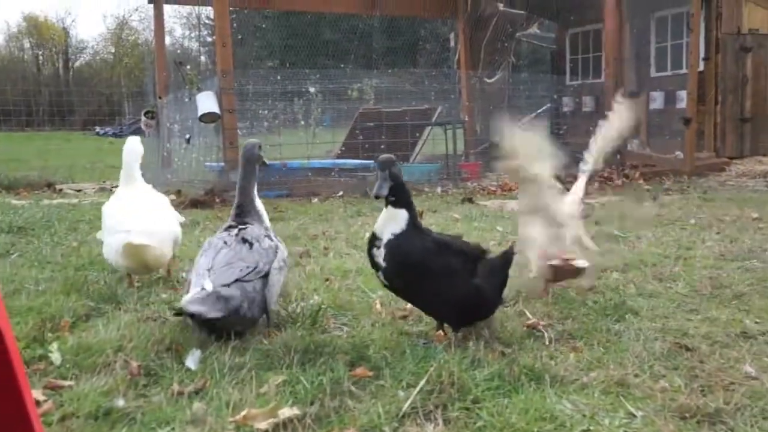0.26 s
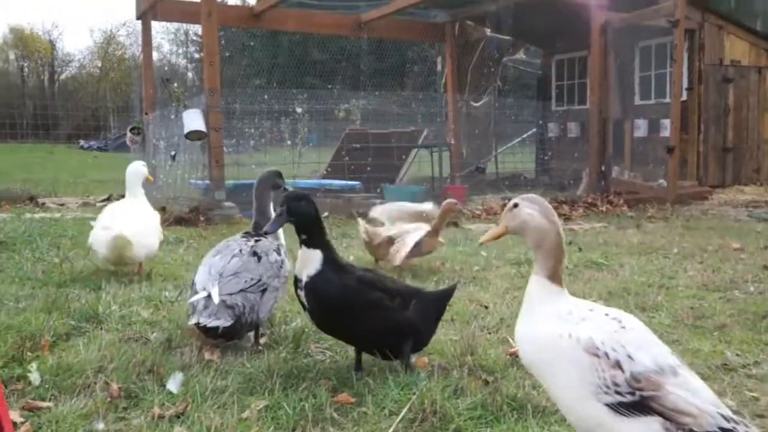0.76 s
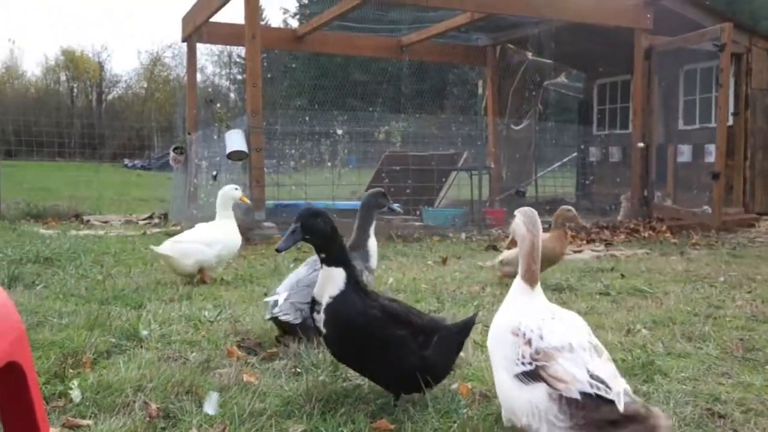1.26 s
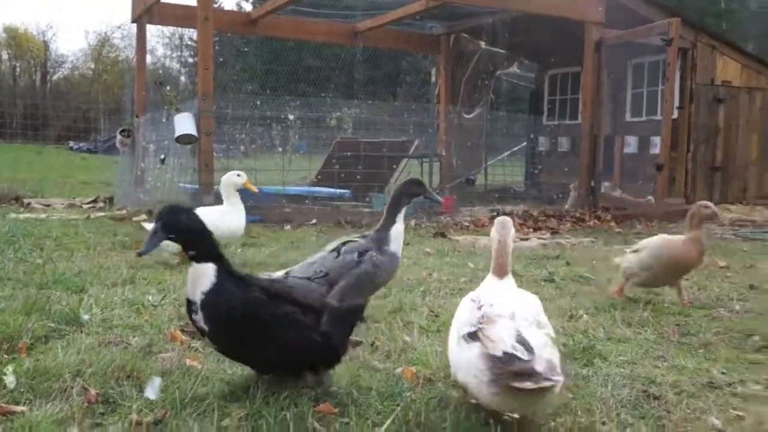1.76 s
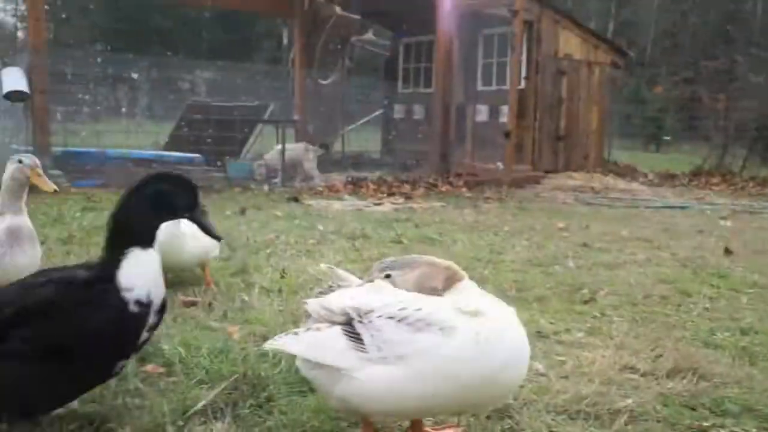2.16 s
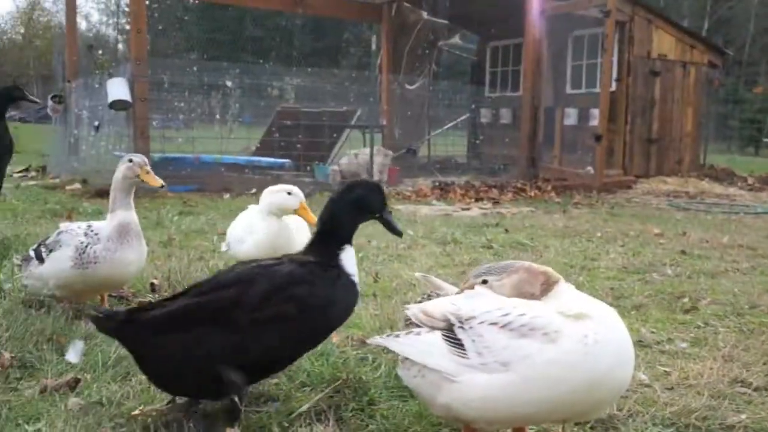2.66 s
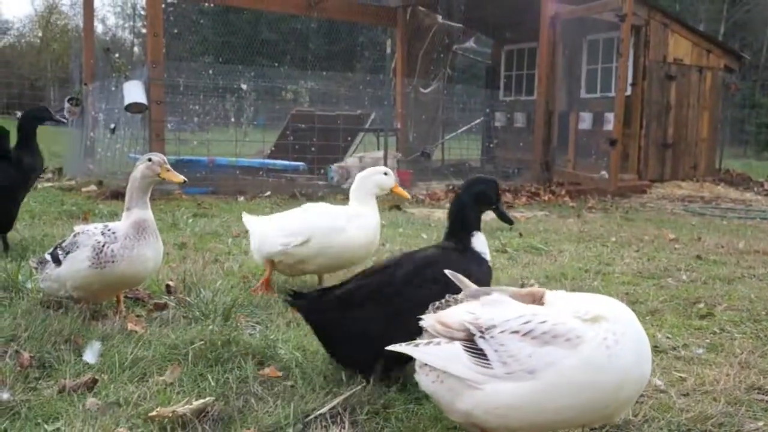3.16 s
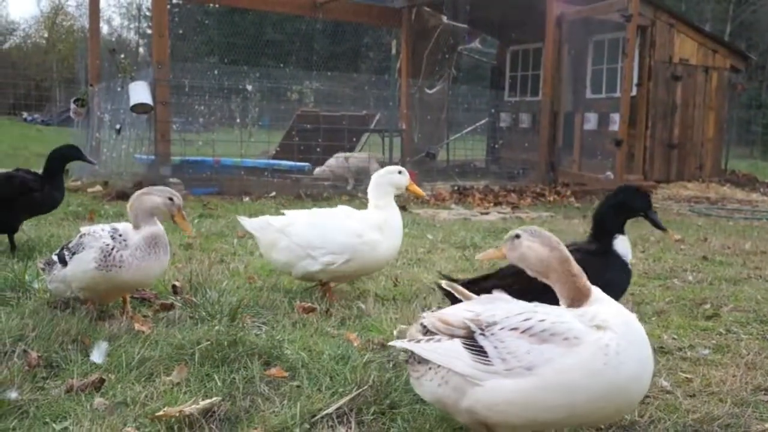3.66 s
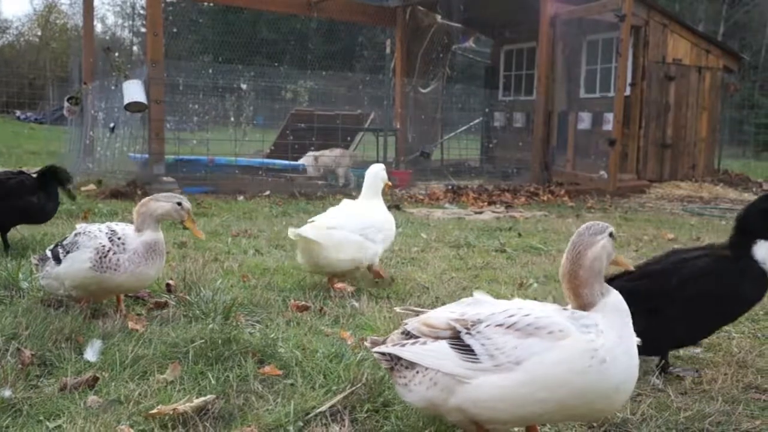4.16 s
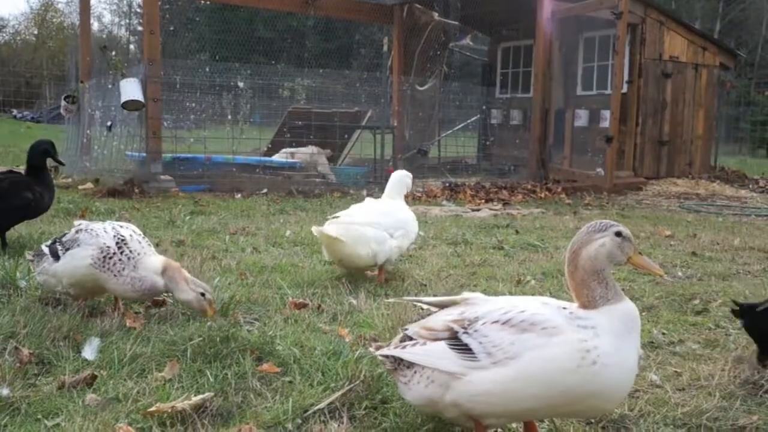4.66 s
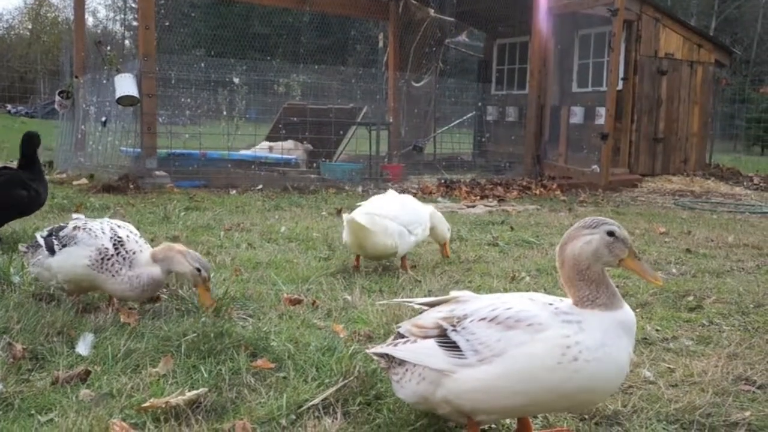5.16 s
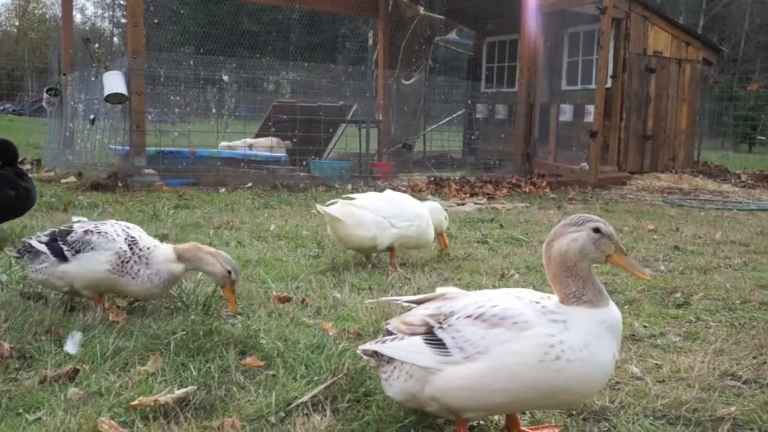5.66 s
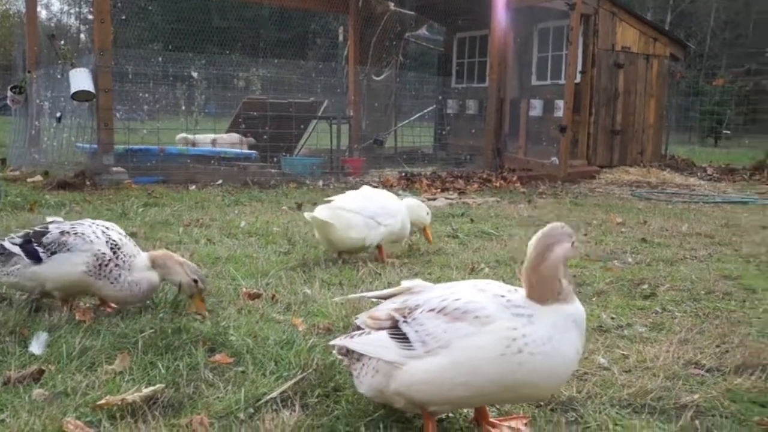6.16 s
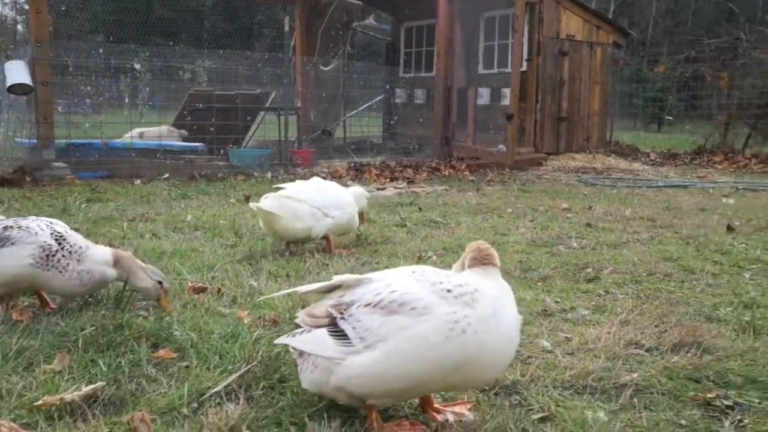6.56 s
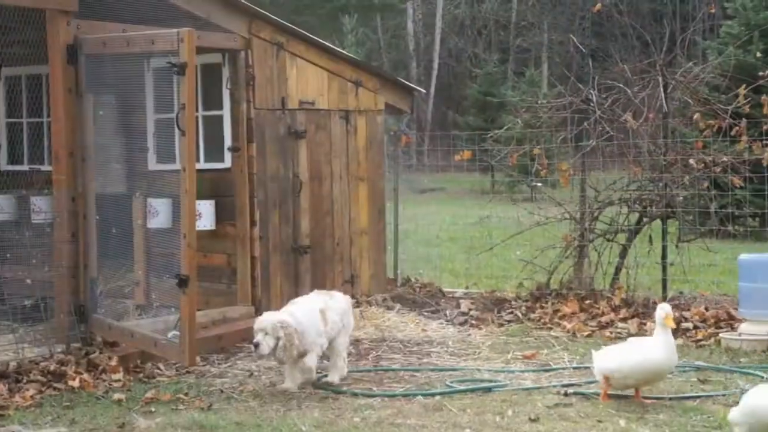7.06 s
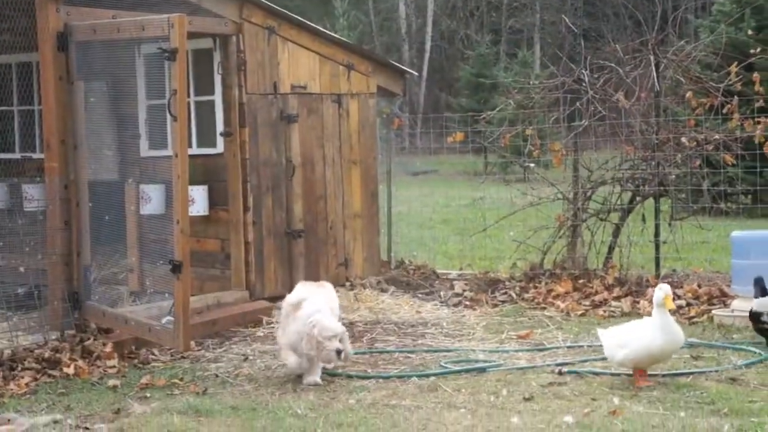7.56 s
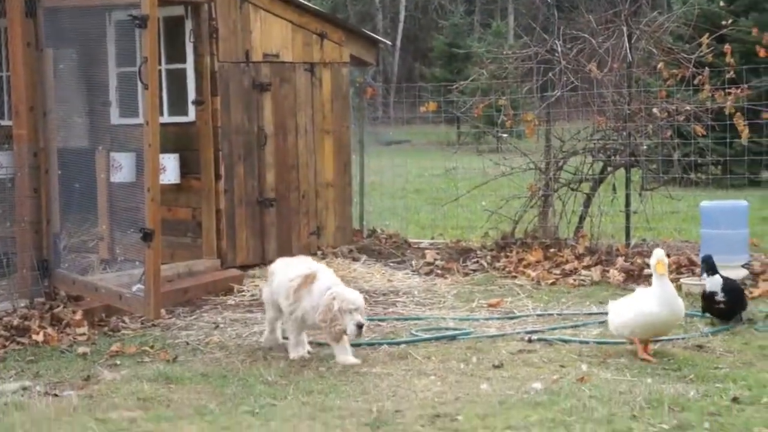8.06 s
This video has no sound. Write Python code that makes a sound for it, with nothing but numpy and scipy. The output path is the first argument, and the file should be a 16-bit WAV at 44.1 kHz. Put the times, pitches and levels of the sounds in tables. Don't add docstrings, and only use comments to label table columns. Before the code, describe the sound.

Domestic ducks quack loudly and close on a lawn, with soft clucks, brief squeaks and grass rustles, then fainter calls across the yard.

```python
import sys
import numpy as np
from scipy import signal
from scipy.fft import rfft, irfft
from scipy.io import wavfile
from scipy.ndimage import uniform_filter1d

SR = 44100
rng = np.random.default_rng(int(sys.argv[2]) if len(sys.argv) > 2 else 0)


def how_loud(loudness_db):
    steps = np.asarray(loudness_db, float) / 20
    return 10 ** steps


def bounce(signal):
    frames = np.transpose(np.atleast_2d(signal))
    limited = np.clip(frames, -1, 1)
    pcm = np.round(limited * 32767).astype(np.int16)
    wavfile.write(sys.argv[1], SR, pcm)


N = 366912

# [t/s, left-right level/dB]
FLOCK_SIDE = [(0.0, -9.5), (0.32, -2.5), (7.0, -8), (7.53, -4.5), (8.32, -4)]


def ducks():
    # [t/s, length/s, level/dB, pulse rate f/Hz, throat f/Hz]
    fading = [
        (0.0, 0.027, -11.5, 198.5, 1360),
        (.154, 0.1, -13, 234.9, 1350),
        (.419, 0.068, -13, 253.7, 1337),
        (1.006, 0.068, -16, 236.9, 1280),
        (1.226, 0.06, -14, 241.3, 1280),
        (2.386, .048, -12.5, 239.7, 1280),
        (4.44, 0.098, -32.5, 263, 1210),
        (5.223, 0.041, -17, 243, 1280),
    ]
    # [t/s, length/s, level/dB, pulse rate f/Hz, throat f/Hz]
    held = [
        (1.591, 0.08, -19, 241.3, 1264),
        (1.931, 0.043, -17.5, 245, 1275),
        (2.603, 0.038, -13.5, 253.3, 1330),
        (2.844, 0.059, -14.5, 264, 1353),
        (3.431, 0.049, -15, 244.2, 1300),
        (5.491, 0.051, -19.5, 252.6, 1348),
    ]
    # [t/s, length/s, level/dB, pulse rate f/Hz, throat f/Hz]
    swelling = [
        (.595, .035, -22, 219, 1150),
        (4.488, 0.044, -31, 198.2, 840),
        (4.669, 0.035, -27, 215, 880),
    ]
    # [t/s, length/s, level/dB, pulse rate f/Hz, throat f/Hz]
    squawks = [
        (1.5, 0.037, -15.5, 245, 1780),
    ]
    # [t/s, length/s, level/dB, pulse rate f/Hz, throat f/Hz]
    distant = [
        (6.866, 0.046, -35.5, 245, 1270),
        (7.231, .06, -32.5, 266, 1280),
        (7.626, .043, -29, 245, 1324),
        (7.813, 0.046, -24, 251, 1290),
        (8.163, .067, -28, 255.3, 1150),
        (8.28, 0.055, -27, 261.7, 1320),
    ]
    # [t/s, length/s, level/dB, pulse rate f/Hz, throat f/Hz]
    barked = [
        (3.488, .03, -23.5, 268, 1460),
        (4.695, 0.03, -18, 222.8, 1370),
        (7.441, 0.05, -25.5, 264.2, 1390),
    ]
    voice_of = { "fading": dict(swell_db_per_s=-120, sag_hz_per_s=650, glide_hz_per_s=-900, upper_db=-20, bill_db=-31, hum_db=-10.5, overtone_db=-2.5),
                "held": dict(swell_db_per_s=-21.5, sag_hz_per_s=910, glide_hz_per_s=-800, upper_db=-18, bill_db=-33, hum_db=-6, overtone_db=-35.5),
                "swelling": dict(swell_db_per_s=284, sag_hz_per_s=1200, glide_hz_per_s=9300, upper_db=-19, bill_db=-23.5, hum_db=1, overtone_db=-11),
                "squawk": dict(firm_s=.01, swell_db_per_s=-170, sag_hz_per_s=2900, glide_hz_per_s=-22000, upper_db=-24, bill_db=-22, hum_db=-39, overtone_db=4),
                "barked": dict(swell_db_per_s=5, sag_hz_per_s=1000, glide_hz_per_s=-3000, upper_db=-17, bill_db=-34, hum_db=-30.5, overtone_db=-11.5),
                "distant": dict(swell_db_per_s=102, sag_hz_per_s=1800, glide_hz_per_s=530, upper_db=-11, bill_db=-26.5, hum_db=-19, overtone_db=8),
                }
    rasp_of = {"fading": (.12, .13, 1), "held": (.06, .08, 1), "swelling": (.2, .22, 1),
               "squawk": (.15, .12, .2), "distant": (.17, .15, 1), "barked": (.2, .2, .1)}
    # [t/s, length/s, level/dB, chest f/Hz]
    clucks_open = [(0.041, 0.025, -29.5, 334), (0.075, 0.044, -31.5, 402), (0.107, 0.025, -29, 290),
                   (0.384, 0.024, -35.5, 376), (0.959, 0.01, -40, 400), (1.161, 0.0096, -38.5, 382),
                   (1.669, 0.034, -40, 334), (1.85, 0.0056, -34.5, 360), (1.889, 0.0057, -43, 348),
                   (2.072, 0.082, -40, 383.4), (2.242, 0.018, -37, 313), (2.296, 0.012, -44, 299),
                   (2.316, 0.029, -40, 412), (2.509, 0.015, -40.5, 426), (2.664, 0.03, -48.5, 331),
                   (2.973, 0.02, -53.5, 374), (3.292, 0.052, -46.5, 325), (3.366, 0.076, -38.5, 356.4),
                   (3.532, 0.028, -42, 399), (3.647, 0.029, -43, 306), (4.245, 0.016, -49, 318),
                   (5.304, 0.022, -40, 376.5), (7.678, 0.036, -48, 343), (8.102, 0.025, -61, 253)]
    # [t/s, length/s, level/dB]
    chirps = [
        (0.534, 0.022, -29.5),
        (0.857, 0.02, -28.5),
    ]
    # [t/s, length/s, level/dB, chest f/Hz]
    clucks_closed = [(0.309, 0.047, -44, 239.5), (0.725, 0.019, -43.5, 362), (2.427, 0.009, -40, 366),
                     (2.535, 0.033, -49.5, 364), (2.699, 0.016, -35.5, 315), (2.747, .03, -36.5, 275),
                     (2.823, 0.0084, -33, 355), (3.257, 0.033, -44.5, 267.5), (3.603, 0.031, -46.5, 352),
                     (3.906, 0.026, -52.5, 261), (4.109, 0.019, -46.5, 356), (4.299, 0.038, -44, 277),
                     (4.363, 0.024, -53, 333), (4.575, 0.022, -43, 337), (4.609, 0.0092, -45, 258),
                     (5.059, 0.017, -44.5, 304), (5.151, 0.1, -47.5, 352), (5.441, 0.012, -52.5, 243)]
    # [t/s, length/s, level/dB, throat f/Hz]
    clucks_thin = [(0.804, 0.16, -53, 1150), (1.368, 0.021, -26.5, 1740), (1.41, 0.066, -42.5, 1800),
                   (1.537, .014, -31.5, 960), (1.971, 0.066, -38, 1260), (2.658, .03, -47, 1490),
                   (4.73, 0.041, -43.5, 1280), (7.025, 0.025, -38, 736), (7.321, 0.015, -33, 714),
                   (7.378, 0.03, -52, 1420), (7.746, 0.028, -36.5, 716), (7.775, 0.038, -29, 744),
                   (7.973, 0.011, -50, 1300), (8.005, 0.023, -38.5, 1140), (8.044, 0.03, -31, 710),
                   (8.112, 0.009, -46, 1090)]
    # [from f/Hz, to f/Hz, share/0-1]
    cavities = [(1900, 2100, .3), (2400, 2620, .45), (3300, 3600, .7), (4400, 4600, .5)]

    soft, chest = np.zeros(N), np.zeros(N)
    kinds = dict(fading=fading, held=held, swelling=swelling, squawk=squawks, distant=distant, barked=barked)
    voices = np.zeros((2, N))
    for kind, rows in kinds.items():
        for row in rows:
            voices += quack(chest, row, rasp_of[kind], **voice_of[kind])
    for s, length, db, note_hz in clucks_open:
        cluck(soft, chest, s, length, db, db - 5.5, note_hz, throat_hz=1150)
        soft += hummed(s, db - 5, overtone_db=-19)
    for s, length, db in chirps:
        cluck(soft, chest, s + 0.0085, length, db, db - 4, note_hz=515, throat_hz=1030, upper_db=-28)
        soft += hummed(s, db + 2.5, overtone_db=-31)
    for s, length, db, note_hz in clucks_closed:
        cluck(soft, chest, s, length, db - 0.5, db, note_hz, throat_hz=1150)
    for s, length, db, throat_hz in clucks_thin:
        cluck(soft, chest, s, length, db, db - 15, 325, throat_hz, upper_db=-14.5)

    side_db, = in_time(FLOCK_SIDE, np.arange(N) / SR)
    voices = voices + ears(soft, side_db)
    for low_hz, high_hz, share in cavities:
        voices = share * filtered(voices, 2, [low_hz, high_hz], "bandstop") + (1 - share) * voices
    voices = voices + ears(squeaks(), side_db)
    return filtered(voices, 4, 780, "high"), filtered(chest, 3, 520, "low")


def quack(chest, row, rasp, swell_db_per_s, sag_hz_per_s, glide_hz_per_s, upper_db, bill_db, hum_db,
          overtone_db, firm_s=0.045):
    # [t/s, left-right level/dB]
    places = [(0.0194, -2.0), (0.1585, 2), (0.4344, 0), (0.5955, -0.5), (1.0081, 0.5), (1.2301, -1),
              (1.503, -2), (1.6043, 1.5), (1.9275, 1.5), (2.3895, 1), (2.612, 0.0), (2.8534, -1.5),
              (3.4401, -3.5), (3.494, -7), (4.4478, -6), (4.4994, -3), (4.6937, 0.5), (5.2305, -4.5),
              (5.4989, -6), (6.8653, -5.0), (7.235, -5), (7.4425, -5.5), (7.6291, -6.5), (7.8194, -5.5),
              (8.1693, -5), (8.2846, -2)]
    # [palate level/dB, bill root level/dB, mid bill level/dB, tip level/dB]
    heads = [(-0.5, -2, 0, 0.5), (-3, -7, -4.5, 1), (-1, -2, 0.5, 2), (-1, 4, -3, 0), (10.5, 8, -4.5, 6.5),
             (6, 1.5, 2, 4.5), (14, -16, -2.5, -4), (-4, 6, -1, 1), (-3, 8, -7, 1.5), (3, -17, -9, -6.5),
             (-8.5, 0, 2, 6), (-4.5, 0, -4, 6), (2.5, -13, -6, 5.5), (6.5, 0, 6.5, 8.5), (16, 5, 28, 19),
             (5.5, 0.5, 17, 17), (5, 8, 5, -8), (6.5, -11, -4, 0), (-0.5, -2, -9, 4.5), (-3, -5, 13, -1),
             (4, 0, 19, 6), (7, 3, 16.5, 8), (-10, 12, 10, -1), (-10, -1, 2, -9), (-2, -12, 10, 4),
             (-0.5, 0, 13, 4.5)]
    # [t/s, level/dB]
    callers = [(0, -35.5), (2.9, -37.5), (3.4, -31.5), (5.6, -30.5), (6.8, -49), (8.32, -37.5)]
    # [f/Hz, width/Hz, level/dB]
    chest_modes = [(245, 580, 13.5), (340, 660, 3)]

    s, length, early_db, early_hz, throat_hz = row
    bird = np.argmin(np.abs(np.transpose(places)[0] - s - .005))
    chest_db, = in_time(callers, s)
    chest_db += 0.57 * (early_db + 19.5)
    held_s = 0.63 * length
    late_db = early_db + swell_db_per_s * held_s
    last_hz = throat_hz + glide_hz_per_s * held_s
    late_hz = early_hz - sag_hz_per_s * max(length - firm_s, 0)
    rows = [(s - .004, early_db - 2.5, 1.5 * early_hz, .85 * throat_hz, chest_db - 2),
            (s + .22 * length, early_db, early_hz, throat_hz, chest_db),
            (s + .78 * length, late_db, late_hz, last_hz, chest_db),
            (s + length, late_db - 10.5, .73 * late_hz, .92 * last_hz, chest_db + 1.5)]
    bill_db += 1.2 * (early_db + 12.5)
    one = np.zeros(N)
    rough, uneven, shut_share = rasp
    call(one, chest, rows, rough, uneven, upper_db, bill_db, chest_modes, shut_share, heads[bird])
    one = one + hummed(s, early_db + hum_db, overtone_db)
    return ears(one, places[bird][1], lag=rng.integers(-1, 2))


def cluck(soft, chest, s, length, throat_db, chest_db, note_hz, throat_hz, upper_db=-16):
    shape = [(-.05, 3), (.2, 7), (.6, 3), (.95, -1)]   # (share of length, dB)
    rows = [(s + u * length, throat_db + d, 0.6 * note_hz, throat_hz, chest_db + d) for u, d in shape]
    call(soft, chest, rows, rough=.4, uneven=.15, upper_db=upper_db, bill_db=upper_db - 12,
         chest_modes=[(note_hz, 130, 0), (.7 * note_hz, 120, -12)])


def call(throat, chest, rows, rough, uneven, upper_db, bill_db, chest_modes, shut_share=1,
         head_db=(0, 0, 0, 0)):
    at, times, size, sizes = pulses(rows, rough, uneven)
    start_s, end_s = rows[0][0], last_s(rows)
    level_db, pitch, centre_hz, chest_db = in_time(rows, times)
    sizes = sizes / np.sqrt(np.sum(sizes ** 2) / len(at)) * np.sqrt(SR / pitch)
    since_s = times - start_s
    shut = shut_share * np.exp(-(since_s / min(.012, .3 * (end_s - start_s))) ** 2)
    hz, width, colour_db = head_modes(since_s, since_s / (end_s - start_s), centre_hz,
                                      upper_db, bill_db, head_db, shut)
    level_db = level_db - 14 * shut
    add(throat, times, sizes * how_loud(level_db), rings(hz, width, colour_db, rise_s=.0004))

    chest_hz, chest_width, part_db = np.transpose(chest_modes)
    thud = rings(chest_hz[None], chest_width, part_db[None], rise_s=.0009)
    period = 1 / pitch_before_jitter(rows, at)
    thud_sizes = size ** 2.28 * np.sqrt(SR * period) * how_loud(chest_db[:len(at)])
    add(chest, times[:len(at)], thud_sizes, np.tile(thud, (len(at), 1)))


def last_s(rows):
    return np.arange(rows[0][0], min(rows[-1][0], (N - 1) / SR), 1 / SR)[-1]


def pitch_before_jitter(rows, at):
    return in_time(rows, at)[1]


def pulses(rows, rough, uneven):
    t = np.arange(rows[0][0], min(rows[-1][0], (N - 1) / SR), 1 / SR)
    cycles = np.cumsum(in_time(rows, t)[1]) / SR
    at = t[1:][np.diff(np.floor(cycles + .9)) > 0]
    n = len(at)
    luck = rng.standard_normal((64, 8))[:n]
    period = 1 / pitch_before_jitter(rows, at)
    size = (1 + uneven * (-1) ** np.arange(n)) * how_loud(6 * rough * luck[:, 0])
    strays = [at + period * np.clip(.5 + .25 * luck[:, k], 0, 1) for k in (2, 3, 4)]
    jittered = np.clip(at + .14 * rough * period * luck[:, 1], 0, t[-1])
    times = np.clip(np.concatenate([jittered, *strays]), 0, t[-1])
    sizes = np.concatenate([size] + [.9 * rough * luck[:, k] for k in (5, 6, 7)])
    return at, times, size, sizes


def head_modes(since_s, done, centre_hz, upper_db, bill_db, head_db, shut):
    # [ratio to main resonance, width/Hz, level/dB]
    throat_modes = [(.75, 190, -9.5), (1.001, 206.5, 0), (1.06, 560, -0.5)]
    # [f/Hz, width/Hz, level/dB]
    upper_modes = [(1740, 234, 5.5), (2140, 280, 0.5)]
    # [f/Hz, width/Hz, level/dB]
    bill_modes = [(2813, 440, 10), (3660, 597, 11.5), (4786, 183, -5), (6170, 450, -9)]

    ratio, width, mode_db = np.transpose(throat_modes)
    still_hz, still_width, still_db = np.transpose([*upper_modes, *bill_modes])
    still_db = still_db + np.repeat([upper_db + 4.5, bill_db + 12.0], [len(upper_modes), len(bill_modes)])
    still_db = still_db + np.array([0, *head_db, head_db[-1]])
    own = rng.standard_normal((2, len(still_hz)))
    still_hz, still_db = still_hz * (1 + .035 * own[0]), still_db + 1.5 * own[1]
    n = len(done)
    hz = np.hstack([centre_hz[:, None] * ratio, np.outer(1.04 - .08 * done, still_hz)])
    hz[:, -6:] *= 1 + .03 * rng.standard_normal((256, 6))[:n]
    colour_db = np.tile(np.concatenate([mode_db, still_db]), (n, 1))
    colour_db[:, -6:] += 2.5 * rng.standard_normal((256, 6))[:n] + 4 - 8 * done[:, None]
    colour_db[:, -4:] -= 250 * np.maximum(since_s - .055, 0)[:, None]
    colour_db[:, -6:] -= 12 * shut[:, None]
    return hz, np.concatenate([width, still_width]), colour_db


def rings(hz, width, level_db, rise_s):
    t = np.arange(600)[:, None] / SR
    wave = how_loud(level_db)[:, None] * np.exp(-np.pi * width * t) * np.sin(2 * np.pi * hz[:, None] * t)
    wave = wave.sum(axis=2) * (1 - np.exp(-t[:, 0] / rise_s)) ** 2
    return wave / np.sqrt((wave ** 2).sum(axis=1, keepdims=True))


def hummed(s, level_db, overtone_db):
    opening_s, first_hz, sag_hz_per_s = 0.021, 1054, 13000
    out, t = np.zeros(N), np.arange(int(opening_s * SR)) / SR
    phase = 2 * np.pi * (first_hz * t - .5 * sag_hz_per_s * t ** 2)
    note = np.sin(phase) + how_loud(overtone_db) * np.sin(2 * phase)
    note = note * np.sin(np.pi * (t / opening_s) ** 1.2)
    add(out, np.array([max(s - .005, 0)]), [how_loud(level_db)], [note])
    return out


def squeaks():
    # [t/s, f/Hz, level/dB, second partial level/dB]
    long_squeak = [(4.255, 880, -50, -64), (4.29, 1300, -57, -76), (4.35, 1500, -60, -74),
                   (4.415, 1720, -55, -60), (4.46, 2000, -56, -80), (4.52, 2390, -47, -56),
                   (4.61, 2280, -46, -57), (4.64, 2320, -45, -55), (4.695, 2090, -45, -56)]
    # [t/s, length/s, level/dB, first f/Hz, last f/Hz]
    peeps = [
        (3.296, .024, -39, 1023, 1253),
        (3.329, 0.042, -25.5, 992, 1190),
        (3.408, 0.02, -24, 1280, 1320),
    ]
    # [t/s, length/s, level/dB, first f/Hz, last f/Hz]
    pipes = [
        (1.81, .03, -52, 1500, 1250),
        (2.055, .018, -46, 1150, 800),
        (4.26, .016, -57, 2200, 2300),
        (4.335, .045, -49, 2230, 2800),
        (4.375, .03, -56, 2450, 2500),
        (4.537, .02, -50, 3500, 3750),
        (4.555, .022, -50, 2000, 1150),
        (6.862, .018, -40, 2100, 1850),
        (7.365, .025, -48, 2600, 2950),
        (7.622, .016, -31, 2150, 1850),
    ]
    # [t/s, length/s, level/dB]
    squeal_bursts = [
        (1.352, 0.025, -33),
        (1.381, 0.03, -36.5),
        (1.412, 0.011, -42.5),
        (1.425, 0.017, -33),
        (1.442, 0.025, -35),
        (1.47, .028, -35.5),
    ]
    # [t/s, f/Hz, level/dB, second partial level/dB]
    whine = [(4.432, 1750, -46, -64), (4.447, 1260, -36, -56), (4.465, 1230, -31, -48),
             (4.48, 1260, -35, -54), (4.505, 1200, -37, -58)]

    high_hz, low_hz, low_rise_hz_per_s = 2134, 1280, 2200
    squeal = np.zeros(N)
    for s, length, db in squeal_bursts:
        squeal += whistle(burst(s, length, db, high_hz, .96 * high_hz, -5.5), .9)
        squeal += whistle(burst(s, length, db - 1.5, low_hz, low_hz + low_rise_hz_per_s * length, -13), .9)
    squeal = squeal * (1 + .45 * drift(3000)) + 4.0 * squeal ** 2
    out = filtered(squeal, 2, 5500, "low") + whistle(whine, .55) + whistle(long_squeak, .2)
    out += sum(whistle(burst(*peep, -20.5), .2) for peep in peeps)
    return out + sum(whistle(burst(*pipe, -30), .45) for pipe in pipes)


def whistle(rows, rasp):
    out, i = np.zeros(N), np.arange(int(rows[0][0] * SR), int(rows[-1][0] * SR))
    pitch, first_db, second_db = in_time(rows, i / SR)
    phase = 2 * np.pi * np.cumsum(pitch * (1 + .04 * rasp * drift(120, i))) / SR
    flutter = how_loud(3.5 * rasp * drift(90, i))
    flutter = flutter * (1 + rasp * drift(500, i) + .6 * rasp * np.sin(phase / 7.3))
    fade = signal.windows.tukey(len(i), min(.2, .02 * SR / len(i))) * np.sqrt(2) * flutter
    overtone = how_loud(second_db) * np.sin(2 * phase) * np.clip(1 + .35 * drift(60, i), 0, 2)
    out[i] = fade * (how_loud(first_db) * np.sin(phase) + overtone)
    return out


def burst(s, length, db, first_hz, last_hz, overtone_db):
    return [(s + u * length, first_hz + u * (last_hz - first_hz), db + d, db + d + overtone_db)
            for u, d in [(0, -2.5), (.5, 0.0055), (1, -2.5)]]


def coos():
    # [t/s, length/s, level/dB, f/Hz, tilt/dB per partial]
    coo_rows = [
        (1.365, .025, -27, 368, -12.5),
        (2.073, 0.069, -33.5, 330, -10),
        (2.242, 0.036, -49, 440, 3),
        (5.15, 0.054, -46, 280, -7.5),
    ]
    out = np.zeros(N)
    for s, length, db, hz, tilt_db in coo_rows:
        i = np.arange(int(s * SR), int((s + length) * SR))
        phase = 2 * np.pi * np.cumsum(hz * (1 + .015 * drift(60, i))) / SR
        partials = sum(how_loud(db + tilt_db * k) * np.sin((k + 1) * phase) for k in range(4))
        out[i] = signal.windows.tukey(len(i), .5) * partials
    return out


def low_notes():
    # [t/s, length/s, level/dB, first f/Hz, last f/Hz]
    notes_low = [
        (5.138, 0.081, -50, 1050, 1150),
        (6.877, 0.033, -51.5, 326, 242),
        (7.035, 0.026, -46, 800, 765),
        (7.248, .046, -43.5, 340, 206),
        (7.322, .024, -39.5, 778, 750),
        (7.456, 0.037, -43.5, 338, 226),
        (7.642, .035, -46.5, 335, 231),
        (7.775, 0.031, -41.5, 794, 746),
        (8.052, .026, -39, 795, 760),
    ]
    return sum(whistle(burst(*note, -30), .2) for note in notes_low)


def thumps():
    # [t/s, peak level/dB]
    thump_rows = [
        (0.159, -51),
        (0.429, -44),
        (1.019, -73),
        (1.239, -63),
        (1.509, -66),
        (2.389, -49),
        (2.608, -49),
        (2.85, -41),
    ]
    return bumps(thump_rows, 3.5, int(.006 * SR))


def puffs():
    # [t/s, peak level/dB]
    puff_rows = [(0.085, -27.5), (2.2894, -41), (2.8594, -40.5), (3.398, -38), (3.436, -40), (3.48, -34.5),
                 (5.216, -40.5), (5.486, -30), (6.5863, -45.5), (7.2469, -56), (7.457, -53)]
    hiss = [(2500, -31), (4300, 4.5), (6200, -12), (7600, -8), (8200, 8.5), (8900, -4), (9800, 1), (15800, -26)]
    return bumps(puff_rows, -8.5, 2200) * coloured(hiss, width=0.041)


def ticks():
    # [t/s, peak level/dB, ring f/Hz]
    tick_rows = [(0.0468, -19, 3800), (0.517, -32.5, 4330), (0.6524, -29.5, 11650), (0.85, -36, 6070),
                 (1.321, -26, 10400), (2.0556, -40, 2830), (2.2533, -34.5, 4600), (2.2892, -33, 3430),
                 (2.3027, -25.5, 4800), (2.364, -35, 3000), (2.4306, -31.5, 4240), (2.5868, -25, 2550),
                 (2.694, -44, 3230), (2.7234, -29, 3070), (2.7547, -24, 3120), (2.977, -32, 3600),
                 (3.1823, -41.5, 6480), (3.2076, -40, 5300), (3.3782, -40, 3510), (3.492, -24.5, 2710),
                 (3.616, -41, 2460), (3.623, -43, 3670), (4.091, -34, 8900), (4.2015, -25.5, 3230),
                 (4.3175, -33, 9600), (4.3245, -35, 4540), (4.4347, -30, 2520), (4.8812, -34, 2410),
                 (5.0569, -37, 3620), (5.145, -36, 4510), (5.1924, -32, 3400), (5.283, -36, 3230),
                 (5.308, -40, 3460), (5.414, -35, 3380), (5.8222, -38.5, 8710), (6.034, -38.5, 9200),
                 (6.2046, -37, 8200), (6.4373, -43, 8650), (6.6038, -36, 7670), (7.223, -43, 2500),
                 (7.2469, -30.5, 2640), (7.3718, -28.5, 5600), (7.3894, -34, 3310), (7.4564, -30, 3550),
                 (7.7583, -41, 4360), (7.7863, -34.5, 2630), (8.0563, -46, 3500), (8.0629, -25.5, 4130)]
    out, t = np.zeros(N), np.arange(260) / SR
    s, peak_db, hz = np.transpose(tick_rows)
    noise = [filtered(row, 1, [f / 2, min(2 * f, 15000)], "band")
             for f, row in zip(hz, rng.standard_normal((len(s), 260)))]
    ring = np.sin(2 * np.pi * hz[:, None] * t)
    add(out, s, how_loud(peak_db - 4.0), np.exp(-t / 0.003) * (1.4 * np.array(noise) + .3 * ring))
    return filtered(out, 2, 1500, "high")


def swishes():
    # [t/s, peak level/dB]
    swish_rows = [
        (6.05, -52),
        (6.17, -57),
        (6.26, -52.5),
        (6.57, -53),
        (7.23, -56),
        (7.35, -65),
        (7.44, -50),
    ]
    hiss = [(8000, -30), (11000, -2), (14000, -4), (15800, -2)]
    return bumps(swish_rows, 0, 3500) * coloured(hiss, width=.03)


def lawn():
    # [t/s, rustle level/dB]
    bustle = [(0.0, -41.5), (0.67, -52.5), (1.5, -54.5), (1.67, -59.5), (2.76, -52.5), (2.99, -60),
              (3.31, -59.5), (4.1, -63), (4.59, -54.5), (4.75, -58.5), (7.09, -60.5), (7.28, -59.5),
              (7.69, -65.5), (8.32, -56.5)]
    # [t/s, murmur level/dB, far flock level/dB, ground level/dB]
    spots = [(0, -58.5, -60, -96), (2.8, -52, -52.5, -67), (3, -55, -61, -70), (6.45, -54, -63, -67.5),
             (6.55, -54, -55.5, -71), (6.75, -56, -52.5, -67), (7.0, -54.5, -49, -95),
             (7.3, -56.5, -48.5, -101), (8.32, -54, -48.5, -96)]
    # [f/Hz, level/dB per Hz]
    rustle_spectrum = [(900, -47.5), (1800, -14), (3000, 6), (4700, 4.5), (7300, 0.5), (9000, 2),
                       (15800, -1)]
    # [f/Hz, level/dB per Hz]
    rumble_spectrum = [(25, -68.5), (65, -43.5), (120, -25.5), (180, -13.5), (367, -13), (486, -22.5),
                       (1800, -37), (3960, -120)]
    ground_spectrum = [(20, -56), (40, -14), (100, 7.0), (140, 5.5), (300, -73.0)]
    gabble_spectrum = [(500, -32.5), (900, -17.5), (1350, -19.0), (2200, -20.0), (3500, -43.5)]

    t = np.arange(N) / SR
    bustle_db, = in_time(bustle, t)
    swing_db = bustle_db - bustle_db.mean()
    murmur_db, far_db, ground_db = in_time(spots, t)
    snaps = (rng.random(N) < 40 * how_loud(5 * drift(6)) / SR) * rng.exponential(1, N) * 60
    crackle = 1 + .55 * uniform_filter1d(snaps, size=60)
    rustle = coloured(rustle_spectrum, width=.04) * crackle * how_loud(bustle_db + 0.5 + 2 * drift(22))
    rumble = coloured(rumble_spectrum, width=0.03) * how_loud(murmur_db + swing_db + 0.69 * drift(16.0))
    ground = coloured(ground_spectrum, width=0.04) * how_loud(ground_db + 3.9 * drift(5.4))
    gabble = coloured(gabble_spectrum, width=0.42) * how_loud(far_db + swing_db + 3 * drift(28))
    return rustle + rumble + ground + gabble


def yard(x):
    t60_s = 0.19
    t = np.arange(SR // 3) / SR
    tail = rng.standard_normal((2, len(t))) * how_loud(-60 * t / t60_s) * (t > .02)
    tail = filtered(tail + 0.65 * tail[::-1], 2, [900, 2600], "band")
    return signal.fftconvolve(x[None], tail / np.sqrt(np.sum(tail ** 2) / 2), axes=1)[:, :N]


def filtered(x, order, hz, kind):
    return signal.sosfilt(signal.butter(order, hz, kind, fs=SR, output="sos"), x)


def in_time(rows, t):
    s, *columns = np.transpose(rows)
    return [np.interp(t, s, c) for c in columns]


def drift(rate_hz, at=slice(None)):
    knots = rng.standard_normal(int(N / SR * rate_hz) + 2)
    return np.interp(np.arange(N)[at] / SR * rate_hz, np.arange(len(knots)), knots)


def coloured(spectrum, width):
    hz, level_db = np.transpose(spectrum)
    f = np.maximum(np.arange(N // 2 + 1) * SR / N, 1)
    gain = how_loud(np.interp(np.log(f), np.log(hz), level_db))
    mid, side = irfft(rfft(rng.standard_normal((2, N))) * gain, N)
    x = mid + width * side * [[1], [-1]]
    return x / np.sqrt(np.mean(x ** 2) + 1e-20)


def ears(x, pan_db, lag=0):
    return np.array([np.roll(x, lag) * how_loud(pan_db / 2), x * how_loud(-pan_db / 2)])


def add(out, at_s, sizes, grains):
    for i, size, grain in zip((at_s * SR).astype(int), sizes, grains):
        out[i:i + len(grain)] += size * grain[:N - i]


def bumps(rows, gain_db, samples):
    out = np.zeros(N)
    s, peak_db = np.transpose(rows)
    add(out, s, how_loud(peak_db + gain_db), np.tile(np.hanning(samples), (len(s), 1)))
    return out


def scene():
    near, chest = ducks()
    t = np.arange(N) / SR
    echo_db = np.where(t > 6, -27, -32.5)
    echo = yard(near.mean(axis=0) * how_loud(echo_db))
    chest = ears(chest, 0.11 * in_time(FLOCK_SIDE, t)[0])
    birds = filtered(near + chest, 6, 205, "high")
    birds = birds + ears(coos(), -0.94) + ears(low_notes(), -0.28)
    return birds + echo + thumps() + puffs() + ticks() + swishes() + lawn()


def band_limit(x):
    return signal.sosfilt(signal.butter(12, 16510, fs=SR, output="sos"), x)


def record(dry):
    top = signal.cheby2(12, 50, 16100, fs=SR, output="sos")
    return band_limit(signal.sosfilt(top, dry))


dry = scene()
out = record(dry)
bounce(out)
```